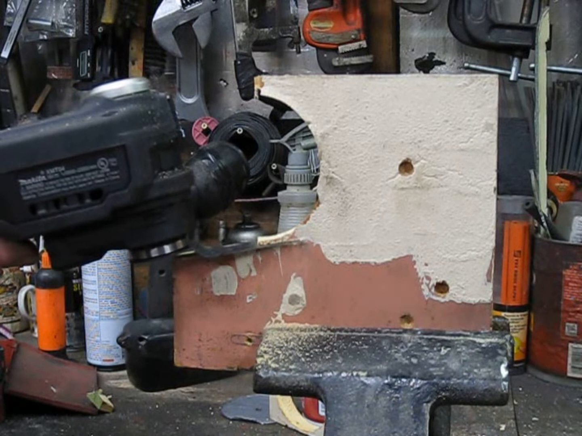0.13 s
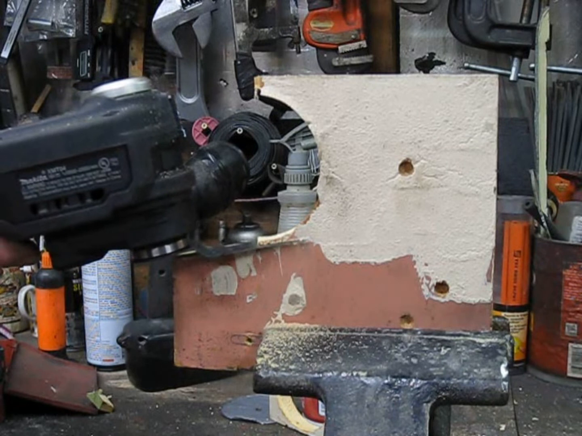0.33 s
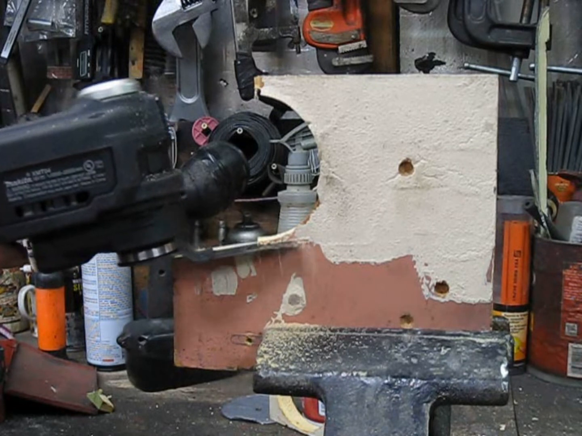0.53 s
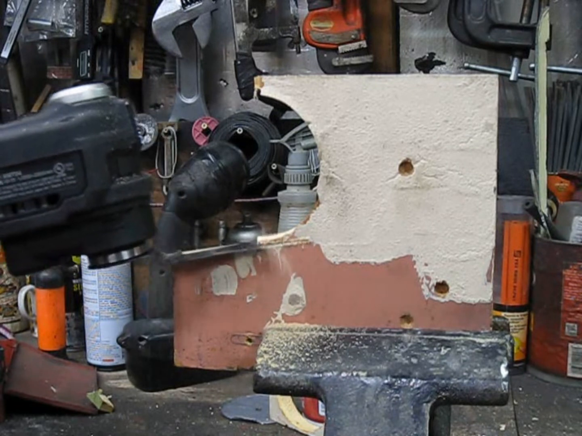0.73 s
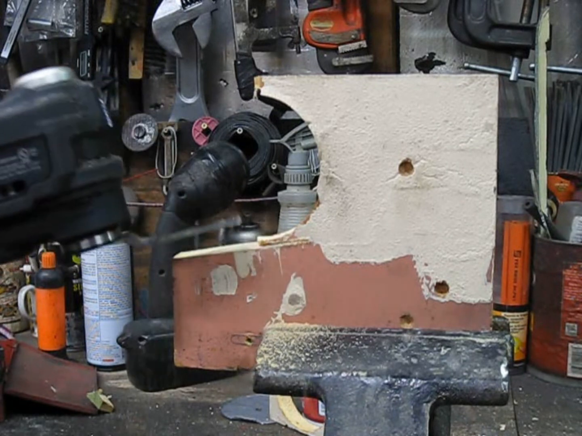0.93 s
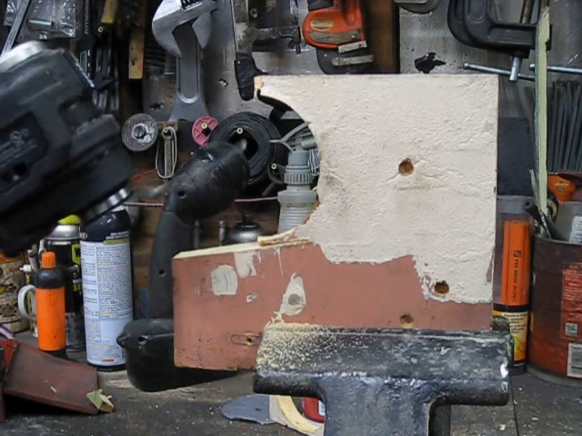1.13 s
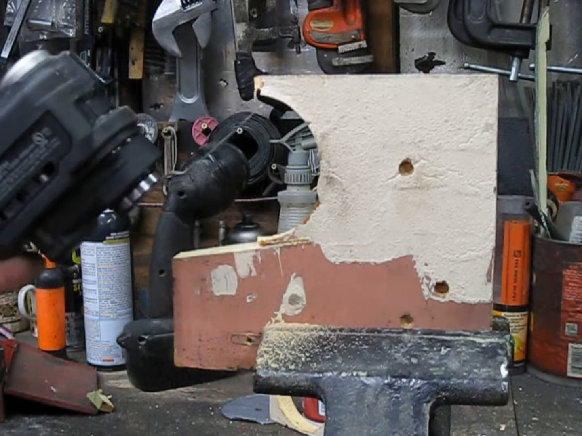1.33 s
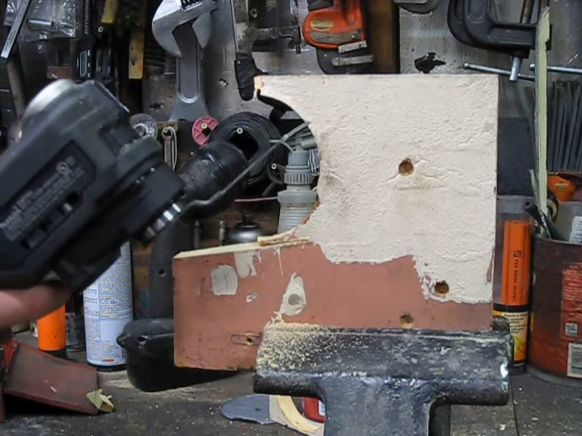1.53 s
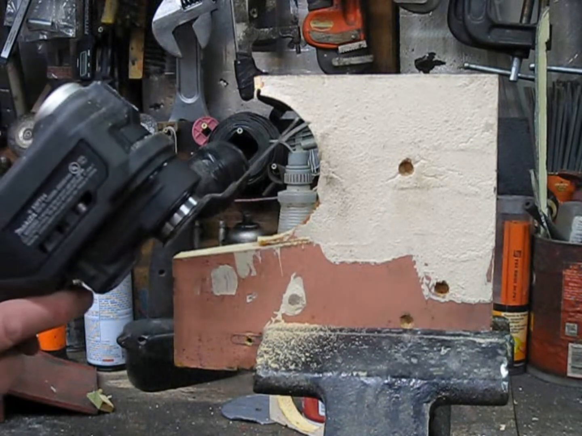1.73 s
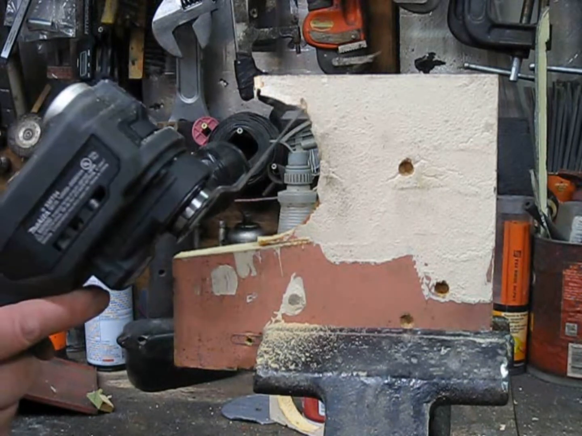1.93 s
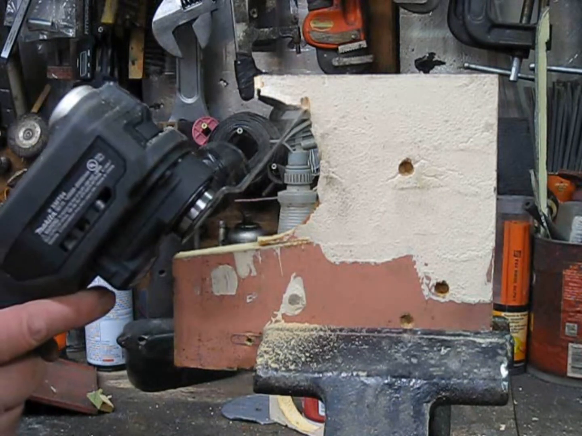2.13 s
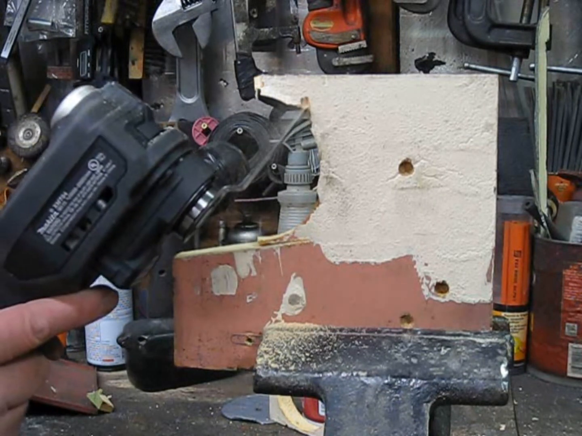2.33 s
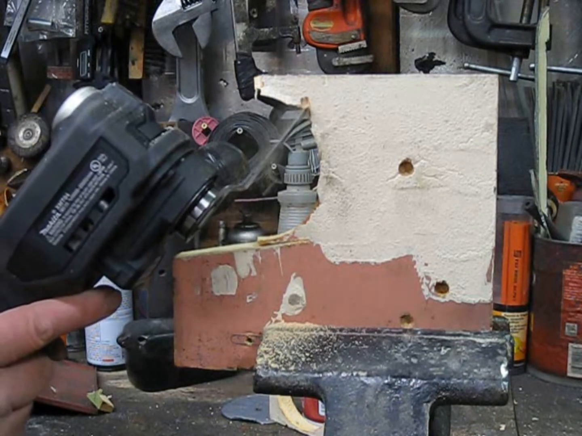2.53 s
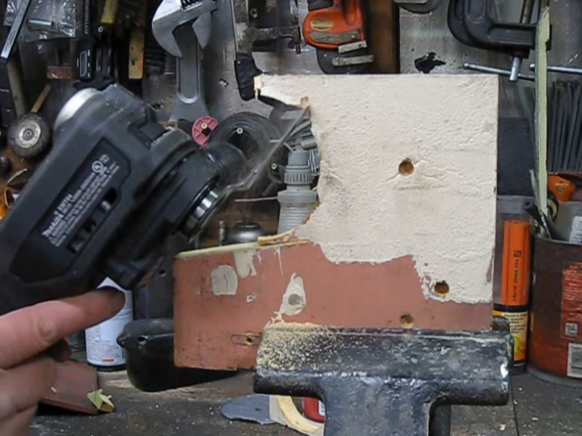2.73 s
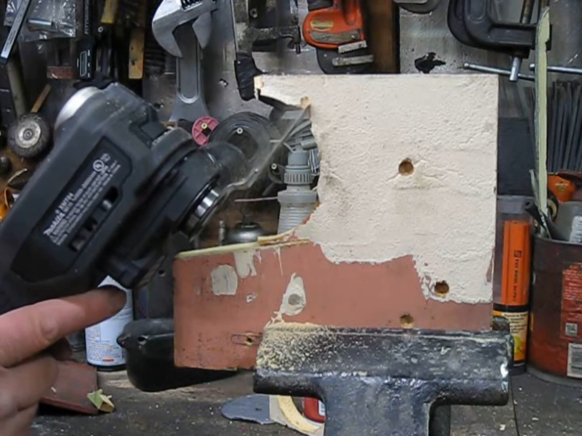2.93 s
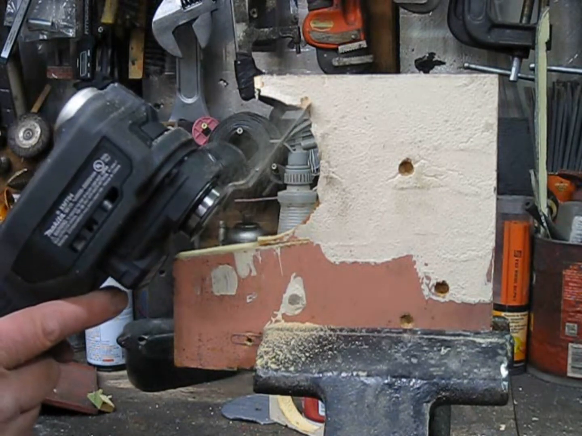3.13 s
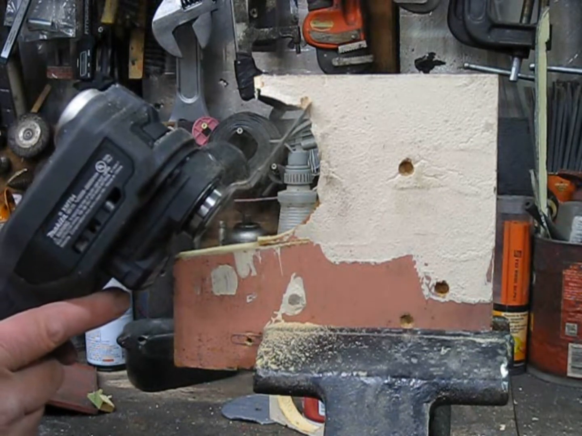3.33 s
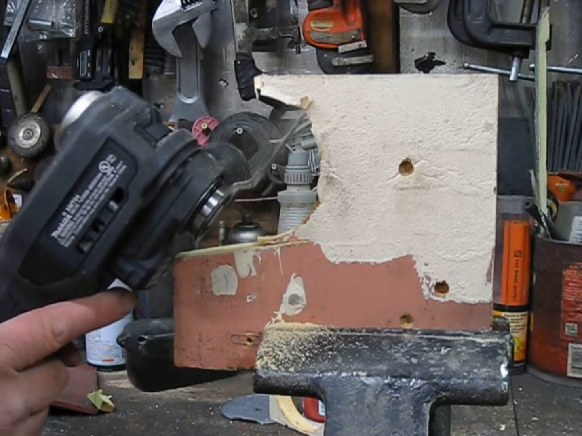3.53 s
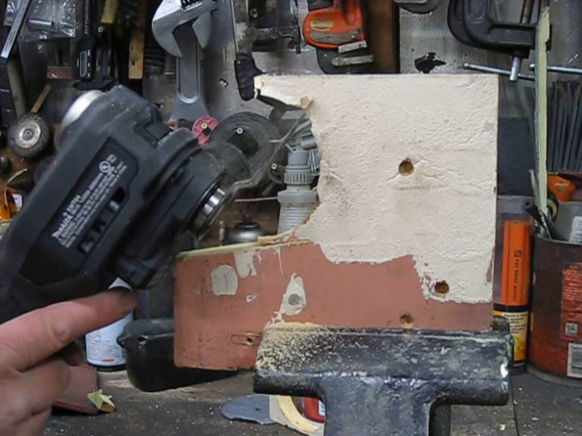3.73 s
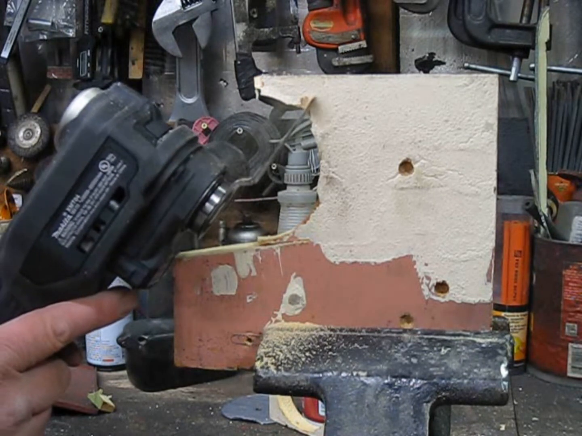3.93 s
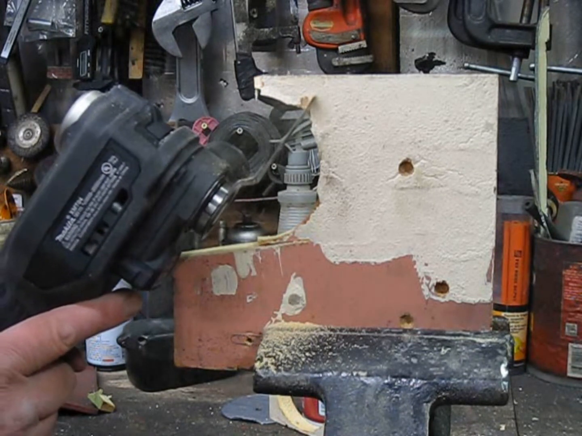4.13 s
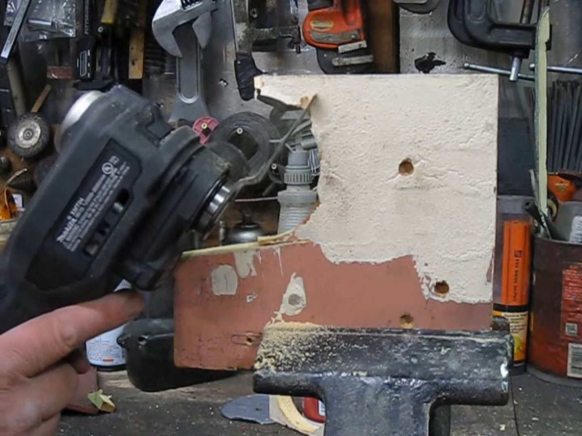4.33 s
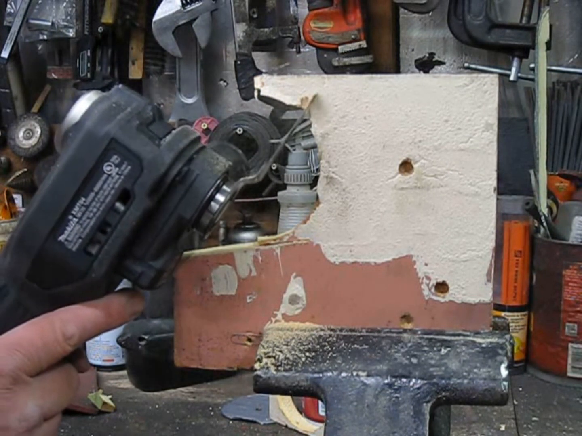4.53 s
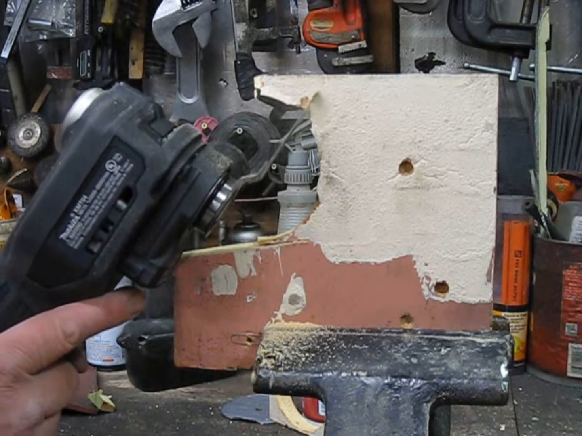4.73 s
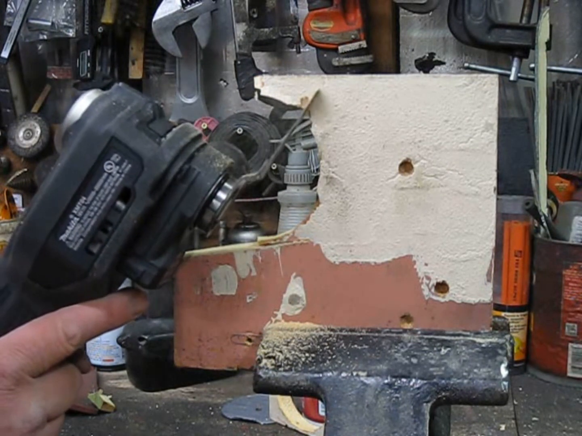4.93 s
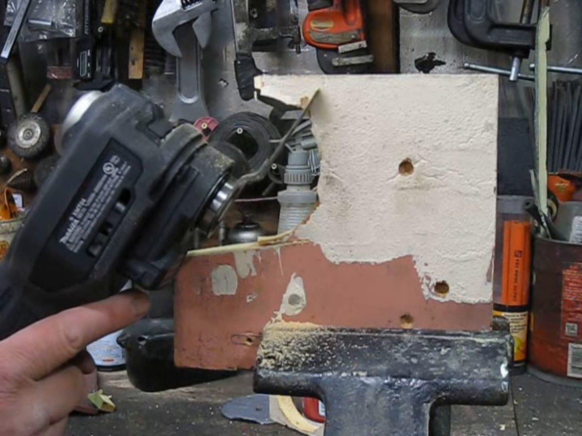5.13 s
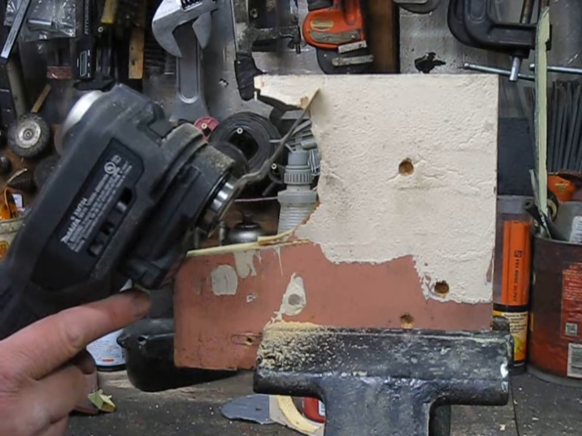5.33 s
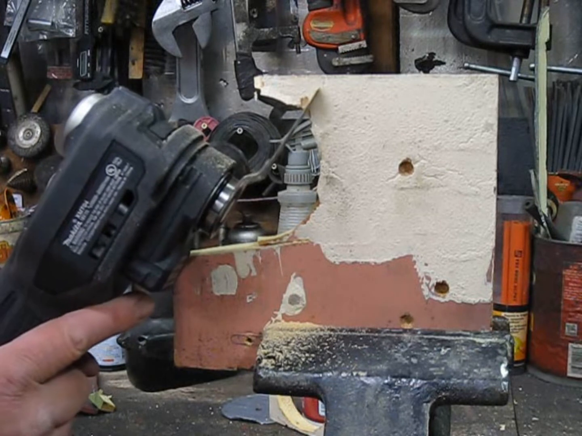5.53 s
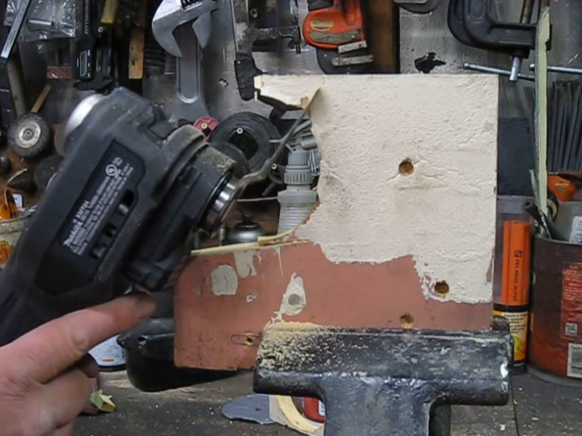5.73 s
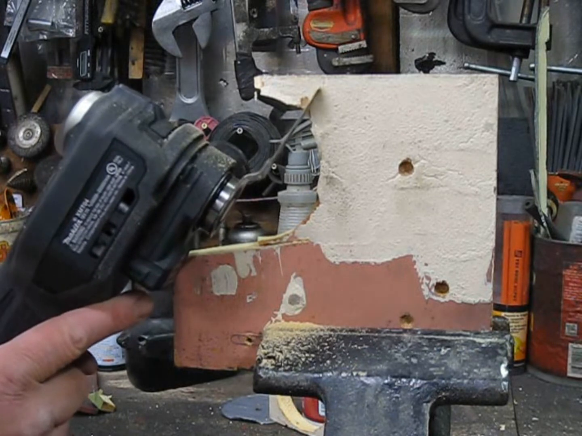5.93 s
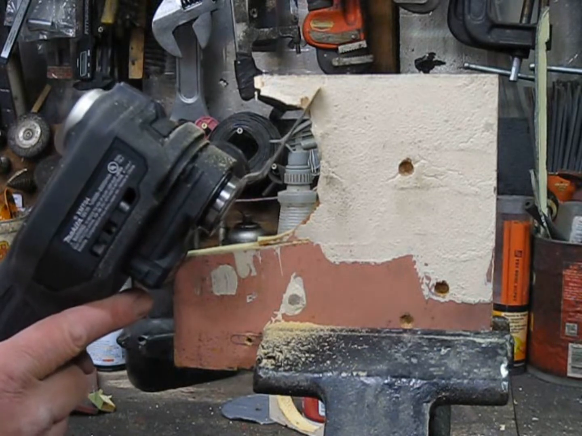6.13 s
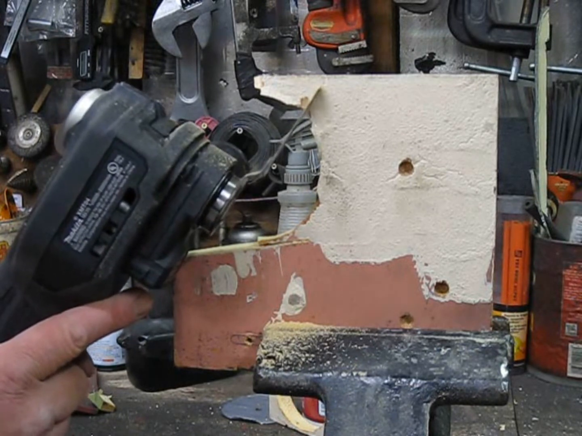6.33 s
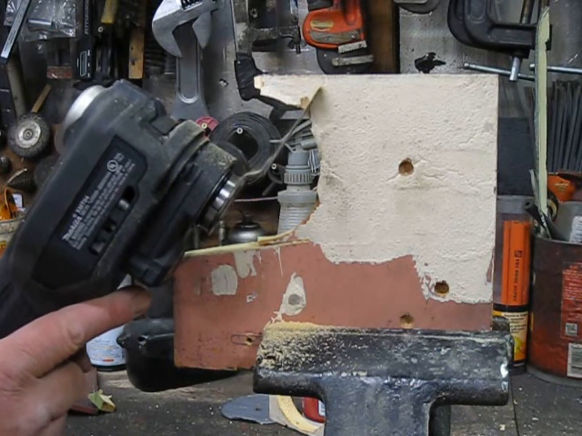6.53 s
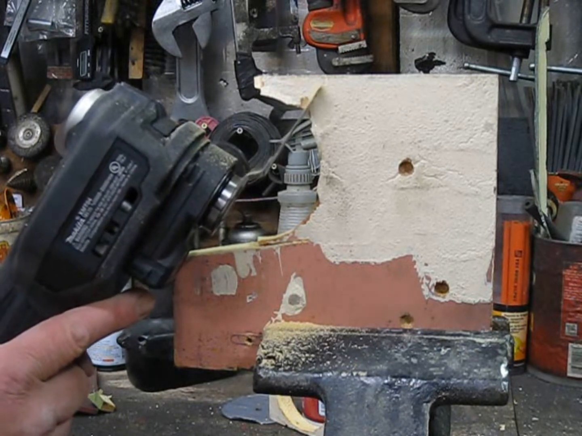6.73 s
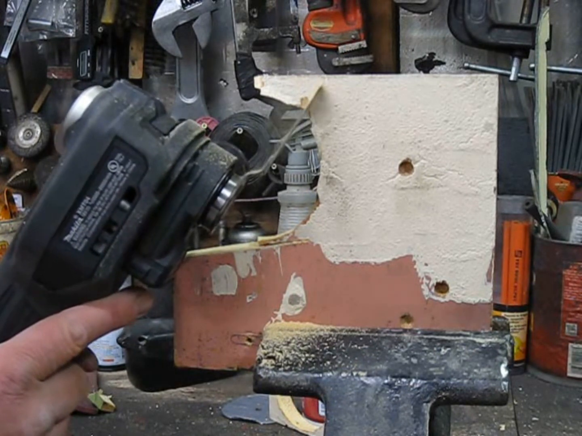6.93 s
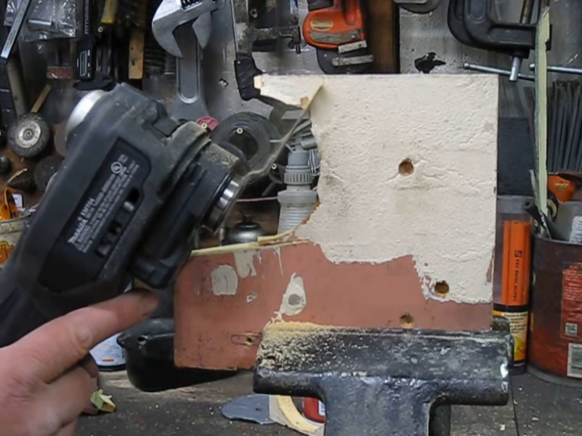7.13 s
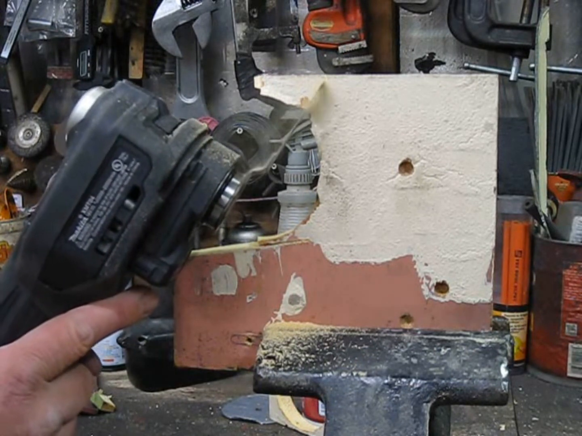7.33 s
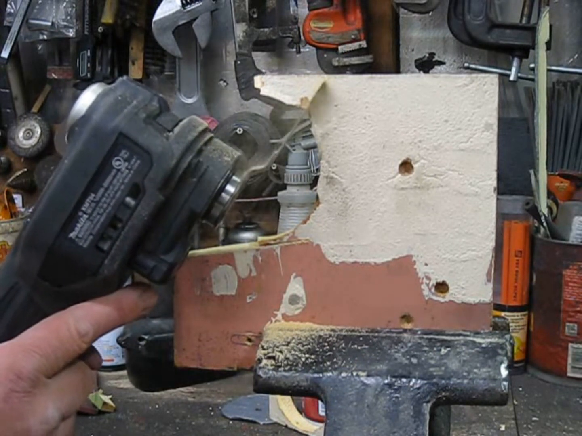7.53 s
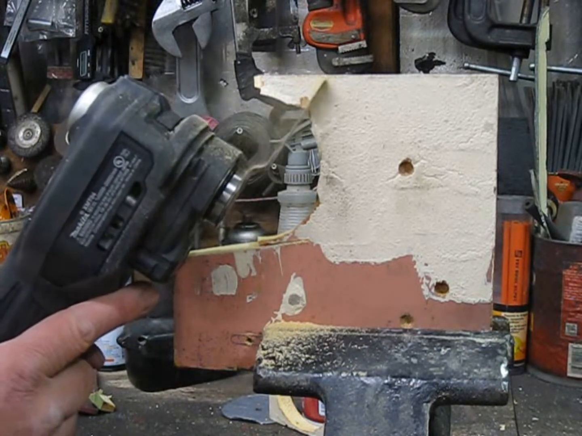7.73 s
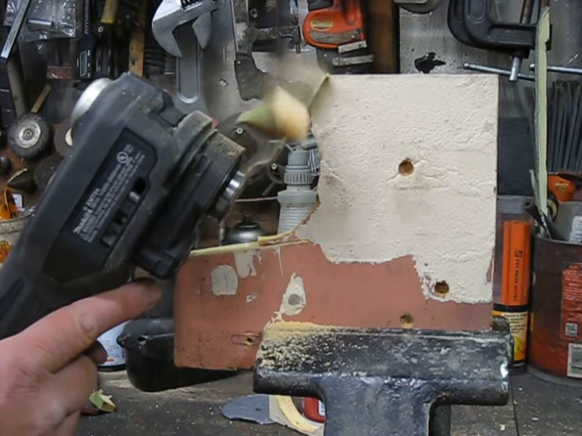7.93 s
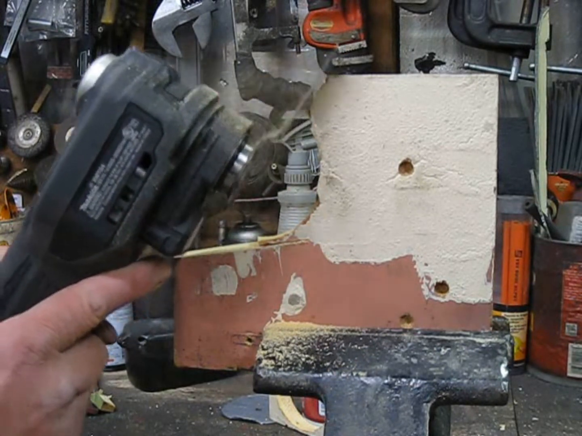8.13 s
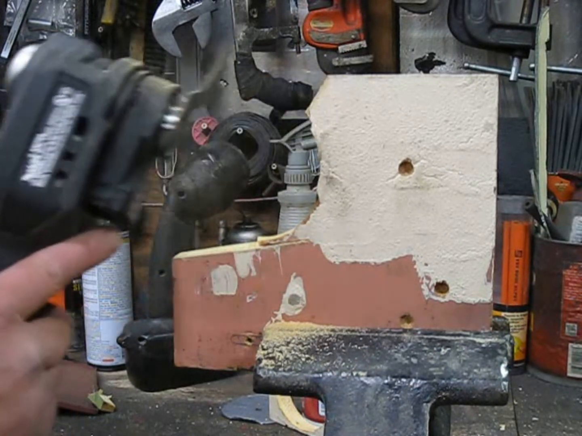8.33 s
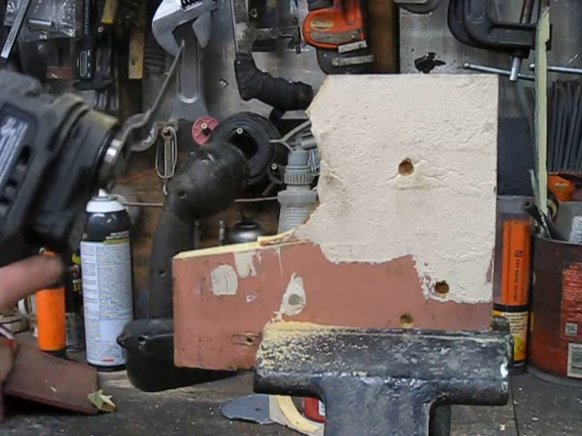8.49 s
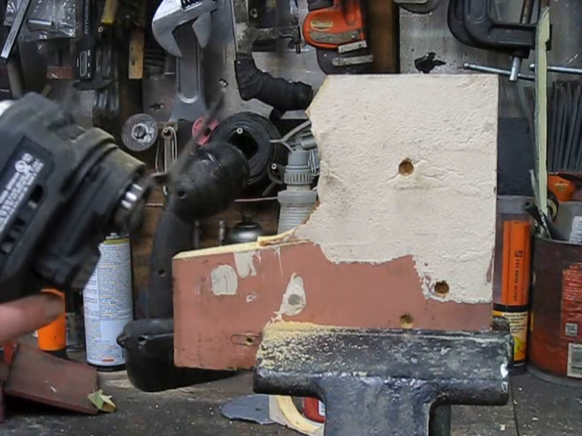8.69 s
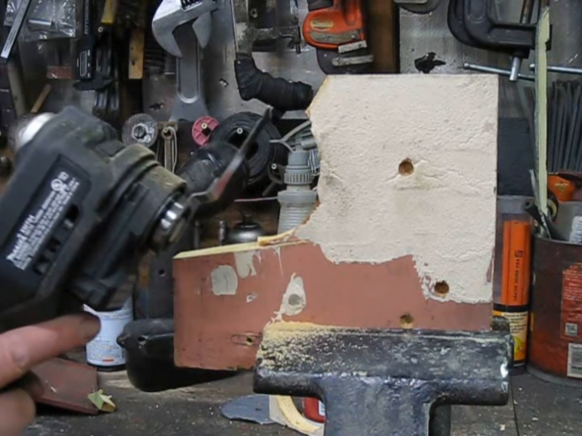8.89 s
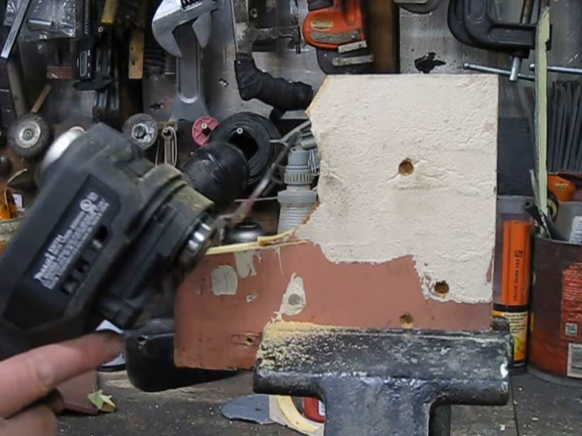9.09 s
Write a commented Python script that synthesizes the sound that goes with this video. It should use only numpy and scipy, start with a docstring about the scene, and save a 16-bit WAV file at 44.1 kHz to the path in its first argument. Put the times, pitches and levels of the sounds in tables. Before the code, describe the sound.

Loud rasping power-tool buzz in wood, a brief free-running whir, then a longer rattling cut rising in pitch until the offcut breaks away and the motor whines on.

```python
"""A small workshop, close by: a cordless oscillating multi-tool saws a corner off a board held in a vise.
The blade cuts, is lifted and runs free, bites in higher up and chatters; the speed dial is turned up
in three steps, the piece breaks off, and the freed blade rings while the motor whines on.
Timed strokes and scraping noise excite resonances of board and blade; the motor is wavering tones,
throbbing fan noise and clicks; snags are decaying noise, with high dying tones; shaped noise murmurs behind."""
import sys
import numpy as np
from scipy import signal
from scipy.io import wavfile
from scipy.ndimage import uniform_filter1d

SR = 44100
rng = np.random.default_rng(int(sys.argv[2]) if len(sys.argv) > 2 else 0)


def digitize_waveform(pressure):
    """Quantize a signal to 16-bit integers and store it at the path in sys.argv[1].

    Rows of a 2-D input are taken as channels; values are limited to [-1, 1].
    """
    field = np.atleast_2d(pressure).T
    bounded = np.clip(field, -1, 1)
    quanta = np.round(bounded * 32767).astype(np.int16)
    wavfile.write(sys.argv[1], SR, quanta)


N = 403956
TIME = np.arange(N) / SR
# nominal swings per second at the four dial settings
SLOW_HZ, LOW_HZ, HIGH_HZ, FAST_HZ = 163.5, 211.7, 269.2, 312.5


def cutting(turns, speed, contact, gains):
    """Strokes and scraping shake the board and the blade; the teeth tear out grit."""
    # modes of the board: main mode, then higher ones [f/Hz, width/Hz, level/dB]
    thump_modes = [(491, 76, 0)]
    knock_modes = [(665, 183, 7), (805, 83, 10), (1028, 68, 6), (1310, 310, -9.5)]
    # modes of the blade: bending, ringing, and its tip [f/Hz, width/Hz, level/dB]
    flex_modes = [(1454, 380, 3), (1509, 75, 12), (1544, 300, 3.5), (2600, 1600, -52)]
    ring_modes = [(2840, 490, 1), (3220, 170, 4), (3570, 160, 1), (3970, 140, -11)]
    tip_modes = [(5100, 200, -1), (8000, 270, 1), (10200, 210, 0.84)]
    # spectra of the bench under the vise and of the torn-out grit [f/Hz, level per Hz/dB]
    bench_spectrum = [(20, -3.5), (70, -1), (160, -3), (300, -7), (600, -25)]
    grit_spectrum = [(3000, -27.5), (3900, 2.5), (4900, 6), (5700, 4), (7800, 3), (10000, -4.5),
                     (12000, -11.5), (15500, -23.5)]
    # the blade's modes move with its seat in the kerf
    # [t/s, bending f/Hz, its prominence/dB, lower ring f/Hz, upper ring f/Hz, singing teeth f/Hz, level/dB]
    seat = [(0, 1830, 5, 2900, 3120, 4540, -8), (.2, 1890, 12, 2840, 3200, 4530, -5),
            (.28, 1770, 17, 3080, 3200, 4520, 5), (.47, 1860, 2, 2930, 3230, 4520, -16),
            (.68, 1750, 11, 3120, 3500, 4520, -2), (.8, 1782, 6, 3120, 3430, 4520, 3),
            (1.85, 1590, -1, 3170, 3340, 5210, -17), (2.6, 1570, 0, 3049, 3380, 5210, -2.5),
            (3.6, 1540, 1, 3130, 3380, 5210, -4.5), (4.8, 1603, -5, 3054, 3300, 5280, -8.5),
            (5.4, 1528, 2, 3060, 3343, 5100, -10), (5.95, 1570, 4, 3104, 3210, 5100, -17),
            (6.45, 1450, -20, 3090, 3320, 5100, -18), (6.85, 1374, 5, 2920, 3200, 4860, -11),
            (7.22, 1479, -3, 2960, 3160, 4860, -4), (7.4, 1360, 3, 2910, 3100, 4970, -16),
            (7.8, 1400, 2, 2850, 3190, 5000, -4)]
    # the blade whistles while still shallow in the kerf [t/s, f/Hz, level against its flexing/dB]
    whistle_track = [(0, 2010, -15), (.8, 1965, -10), (1.8, 2050, 3), (2.2, 2020, 2), (2.7, 1990, 4.5),
                     (3.6, 1964, 5), (4.1, 1965, -2), (5.6, 1980, -5), (6.3, 1958, -19.5)]
    # how far each part swells and sinks [thump/dB, knock/dB, flex/dB, ring/dB, grit/dB, tip/dB]
    swell_db = (1.05, 1.26, 2.25, 1.48, 0.72, 2.8)
    seat_play_hz = 180  # how far a fully rough cut throws the ringing modes about
    rattle_db_per_rough = 3.5  # in a rough cut the blade's ring comes in quick bursts
    chatter_hz = 22.68  # hops of the tool per second, before its drift

    hits, scrape = strokes(turns, contact)
    *_, rough, chatter = contact
    rasp = rough ** 1.5 * scrape
    flex_hz, flex_db, lower_hz, upper_hz, singing_hz, singing_db = curves(seat)
    whistle_hz, whistle_db = curves(whistle_track)
    on_board = shifting(hits + 0.7 * rasp, wet_db=-8, decay_s=0.004, hz=7)
    on_blade = shifting(hits + 1.7 * rasp, wet_db=-7, decay_s=0.005, hz=9)
    on_teeth = shifting(hits + 0.12 * scrape + 2.8 * rasp, wet_db=2, decay_s=0.0088, hz=8)

    # board and bench
    rumble = unit(colour(scrape, bench_spectrum))
    shake = levelled(ring(hits + 2.27 * rasp, thump_modes, 247, 840))
    hum = board_hum(turns, speed, contact)
    thump = hum + 0.49 * rough * shake + amp(-33.5) * rough * rumble
    knock = levelled(ring(on_board, knock_modes, 630, 1590))

    # blade, bending and whistling
    bending = amp(flex_db) * sing(on_blade, flex_hz, 346)
    whistle = amp(whistle_db) * sing(hits + rasp, whistle_hz, 70)
    flex = levelled(levelled(ring(on_blade, flex_modes, 1247, 2780)) + bending + whistle)

    # blade, ringing
    plate = ring(on_blade, ring_modes, 2100, 4450)
    play = seat_play_hz * rough * drift(30)
    steel = levelled(resonate(plate, lower_hz + play, 150) + resonate(plate, upper_hz + play, 150))
    steel = steel * amp(rattle_db_per_rough * rough * drift(90))

    # teeth and tip
    singing = amp(singing_db) * sing(on_teeth, singing_hz, 170)
    grit = levelled(levelled(colour(on_teeth, grit_spectrum)) + singing) * amp(0.6 * drift(70))
    tip = levelled(ring(on_teeth, tip_modes, 4100, 11200))

    layers = (thump, knock, flex, steel, grit, tip)
    parts = [part * amp(db * drift(17)) for part, db in zip(layers, swell_db)]
    # the whole tool hops in the hand
    hop = 1 + chatter * np.cos(2 * np.pi * chatter_hz * (TIME - 4.742) + 2.6 * drift(9.6))
    # under load the housing shudders at the swing rate, far more at speed
    shudder_depth = (speed / FAST_HZ) ** 2 * np.clip(speed / SLOW_HZ - 1, 0, 1)
    shudder = shudder_depth * np.sqrt(2) * np.sin(2 * np.pi * turns)
    return (gains * [*parts, shudder]).sum(0) * hop


def strokes(turns, contact, jitter_s=0.00011, scatter=0.3, scrape_s=0.0022,
            skip_lag_s=0.00025, creep_s=0.00016):
    """The blade pushes the wood at one end of each swing, pulls at the other; teeth scrape in between."""
    count = np.arange(int(2 * turns[-1]))
    swing = count // 2
    at = np.interp(count / 2, turns, np.arange(N))
    tracks = (*contact, drift(9), drift(22))
    back, second, third, rough, _, slip, creep = (track[at.astype(int)] for track in tracks)
    late, strong = rng.standard_normal((len(count), 2)).T
    # the blade bounces: only every second or third swing lands fully and on time;
    # a rough cut loses the pattern
    triple = 2 * np.pi * swing / 3 + 3 * rough * slip
    bounce = (1 + second * np.cos(np.pi * swing)) * (1 + third * np.cos(triple))
    sizes = np.where(count % 2, -back, 1) * bounce * np.exp(scatter * rough * strong)
    delay_s = rough * (jitter_s * late + creep_s * creep) + skip_lag_s * third * np.sin(triple)
    hits = clicks(at + SR * delay_s, sizes)
    # each stroke presses the teeth on for a moment
    r = np.exp(-1 / (SR * scrape_s))
    presses = signal.lfilter([1], [1, -2 * r, r * r], clicks(at, abs(sizes)))
    pressure = levelled(presses) + 0.4
    return levelled(hits), levelled(pressure * rng.standard_normal(N))


def board_hum(turns, speed, contact, mode_hz=486, width_hz=27, half_push=1.08, even_push=1.04,
              skip_depth=0.33, off_mode=0.012, lag_s=0.00066):
    """The board sings louder as a multiple of the swing rate nears its main mode; skips make it throb."""
    back, second, third, rough, _ = contact
    hum = 0
    for k, push in [(3 / 2, half_push * second), (2, even_push * (1 - back)), (3, 1)]:
        detune = (k * speed - mode_hz) / width_hz
        response = 1 / (1 + detune ** 2) + off_mode * (k == 2)
        tone = np.sqrt(2) * np.sin(2 * np.pi * k * (turns - lag_s * speed))
        hum = hum + push * response * tone
    skips = np.cos(2 * np.pi * turns / 3 + 2.4 * rough * drift(18))
    return hum * (1 + skip_depth * third * skips)


def shifting(x, wet_db, decay_s, hz, count=3):
    """Quick echoes inside a solid body, whose pattern keeps changing; in the blade, as the cut moves on."""
    t = TIME[:1024]
    tails = rng.standard_normal((count, len(t))) * np.exp(-t / decay_s)
    echoes = sum(drift(hz) * signal.oaconvolve(x, tail / np.linalg.norm(tail))[:N] for tail in tails)
    return x + amp(wet_db) * echoes / np.sqrt(count)


def handling():
    """What dial, cuts, easing and chatter do: the speed, how the blade lands, how loud each part is."""
    # cuts, with base levels [bites t/s, loses grip t/s, comes clear t/s, board thump/dB, board knock/dB,
    # blade flex/dB, blade ring/dB, tooth grit/dB, running noise/dB]
    cuts = [(-.07, 0.59, 0.803, -21, -31.5, -22.5, -24.5, -36.5, -37),
            (1.778, 7.82, 8.06, -17.5, -24, -26, -39.5, -37, -39.5)]
    # the hand shifts its pressure; easing off, the motor gains speed and the blade rattles in the kerf
    # [t/s, length/s, speed gained/Hz, board level/dB (half of it for the thump), flex/dB, ring/dB]
    eases = [(.23, 0.16, 1.59, -13, 0, -1), (.66, 0.042, 0.24, 1, 2.5, 5), (.735, 0.037, 0.4, -4, 2, 5),
             (2.05, 0.41, 0.22, 1, -1.5, -1), (3, 0.19, 1, 0.5, -1, 1), (4.2, 0.26, 1.28, 0, 0.5, 2),
             (4.83, 0.24, 1.63, -4, 0.5, 7.5), (5.17, 0.13, 0.57, -0.5, 0, 3),
             (5.82, 0.11, 2.5, -2.5, 1.5, 4.5), (5.93, 0.086, 0.48, -1.5, 1, 2),
             (6.4, 0.13, 0, -7.5, -3, -0.5), (6.8, 0.18, 0.14, -1, 3, 1.5),
             (7.02, 0.214, -0.08, -1.5, 3.5, 2.5), (7.38, 0.11, -0.15, -3, 1, 1.5),
             (7.6, 0.066, 1.24, -5, -1, 2), (7.84, 0.44, 1, -4, 2.5, -1.5), (7.873, 0.056, 1.6, 0, 0, 6),
             (7.976, 0.021, -0.5, 5, 6.5, 1), (8, 0.022, 0, 0, 2, -7)]
    # bouts of chatter [t/s, length/s, added roughness/0-1, added hop depth/1, extra return stroke/1,
    # extra skip of every 2nd swing/1, of every 3rd/1, grit level/dB]
    chatters = [(-.05, 0.22, 0.27, 0.0034, 0, 0.11, 0, 0), (.23, 0.18, 0.01, 0, 0.1, -0.084, 0.036, 2),
                (.39, 0.21, 0.17, 0, 0.38, -0.033, 0, 5), (.58, 0.21, 0.28, 0.013, 0.44, 0, 0, 5),
                (1.78, 0.23, 0.36, 0.028, 0.32, 0.16, 0, 3), (2.01, 0.49, 0.04, 0, 0, 0.081, 0.13, -1.5),
                (2.5, 2.04, 0.46, 0, 0.048, -0.14, 0.19, -0.5),
                (4.58, 0.27, 0.55, 0.27, 0.082, 0.13, 0.069, -0.5),
                (4.82, 1, 0.29, 0.033, 0.23, 0.09, 0.00096, -1),
                (6.04, 0.31, 0.41, 0.0082, 0.26, 0.15, 0, -0.5),
                (6.55, 0.24, 0.29, 0.068, 0.19, -0.081, 0, 1),
                (6.93, 0.1, 0.15, 0.087, 0.27, -0.092, 0, -2),
                (7.03, 0.13, 0.29, 0.0065, 0.41, 0.14, 0.019, -2),
                (7.19, 0.21, 0.1, 0.013, 0.13, 0.022, 0, 0), (7.84, 0.36, 0.16, 0.1, 0, -0.34, 0, -1)]
    bite_s, clear_s, recover_s = 0.11, 0.015, 0.094  # cut sets in, cut stops, running noise comes back
    # over the first seconds of a cut the blade flexes less and rings more,
    # and the running noise is heard less
    early_s, early_flex_db, early_ring_db, early_running_db = 2.76, -4.5, 13, -8.5
    # how fast each dies once the teeth lose their grip; the board hums on for a while first
    thump_db_per_s, knock_db_per_s, flex_db_per_s, thump_hold_s = 173, 139, 74, 0.062
    tip_db, tip_rise_s = -33.5, 0.24  # the tip rings up as the teeth lose their grip
    shudder_db = -41.5  # the housing under load
    grit_speed_db = 2.5  # more grit at top speed
    ease_edge_s, ease_grit_share = 0.064, 0.65  # time to ease off; share of the ring's gain in the grit
    chatter_edge_s = 0.056  # longest time a bout takes to set in
    smooth_hop, wander_hz = 0.11, 0.197  # base hop depth; wander of the speed in the wood at SLOW_HZ
    second_per_rough, third_per_rough = 0.038, 0.43  # a rough cut skips every 2nd and 3rd swing more

    speed, back, second, base_rough, knock_dial, ring_dial, running_dial = dial()
    gained, board_ease, flex_ease, ring_ease = spells(eases, ease_edge_s)
    bouts = spells(chatters, chatter_edge_s)
    rough, hop, extra_back, extra_second, extra_third, grit_chatter = bouts
    current = sum(TIME >= cut[0] for cut in cuts[1:])
    bite, loose, clear, thump, knock, flex, steel, grit, loaded = np.transpose(cuts)[:, current]
    under_way = ramp(bite, early_s)
    slack = np.clip(TIME - loose, 0, 1)  # seconds since the grip was lost
    fast = (speed - SLOW_HZ) / (FAST_HZ - SLOW_HZ)
    engaged = ramp(bite, bite_s) - ramp(clear, clear_s)
    gains = engaged * amp([
        thump + board_ease / 2 - thump_db_per_s * np.maximum(slack - thump_hold_s, 0),
        knock + knock_dial + board_ease - knock_db_per_s * slack,
        flex + flex_ease + early_flex_db * under_way - flex_db_per_s * slack,
        steel + ring_dial + ring_ease + early_ring_db * under_way,
        grit + grit_chatter + ease_grit_share * ring_ease + grit_speed_db * fast,
        tip_db + 20 * np.log10(np.clip(slack / tip_rise_s, 1e-3, 1)),
        np.full(N, shudder_db)])
    load = ramp(bite, bite_s) ** 3 - ramp(clear, recover_s) ** 0.5
    running_gain = amp((loaded + running_dial + early_running_db * under_way) * load)
    rough = np.clip(base_rough + rough, 0, 1)
    gained = gained + wander_hz * (speed / SLOW_HZ) ** 2 * drift(14) * engaged
    second = second + extra_second + second_per_rough * rough
    third = extra_third + third_per_rough * rough
    contact = back + extra_back, second, third, rough, smooth_hop + hop
    return speed + gained, contact, gains, running_gain


def dial():
    """The tool glides from each setting to the next like a damped spring."""
    # dial settings; the levels are offsets to those of the cut [t/s, swing rate f/Hz, return stroke share/1,
    # skip of every 2nd swing/1, roughness/0-1, knock level/dB, ring level/dB, running noise level/dB]
    steps = [(0, SLOW_HZ, 0.12, 0.04, 0.16, -2, -3, 26), (6.225, LOW_HZ, 0.16, 0.02, 0.1, -0.5, 6, 6),
             (6.637, HIGH_HZ, 0.3, 0.014, 0.05, 0.5, 3.5, 8), (7.077, FAST_HZ, 0.37, 0.5, 0.12, -1.5, 4, 2)]
    settle_s = 0.052  # time constant at the top setting; lower settings are reached sooner
    settings = np.array(steps)[:, 1:]
    elapsed = np.array([np.maximum(TIME - s, 0) / (settle_s * hz / FAST_HZ) for s, hz, *_ in steps[1:]])
    glide = 1 - (1 + elapsed) * np.exp(-elapsed)
    return settings[0][:, None] + np.diff(settings, axis=0).T @ glide


def catches():
    """Short noise cracks as the blade snags or breaks through; high dying tones as it comes free."""
    # the blade catches an edge [t/s, level/dB, decay/s, brightness per octave/dB]
    snags = [(1.7712, -9, 0.0045, 2.5), (1.8375, -11.5, 0.0074, -6), (1.845, -19, 0.022, 15),
             (7.83, -19, 0.0026, -2), (7.978, -25, 0.0038, 4), (8.036, -30, 0.034, 4),
             (8.053, -19.5, 0.019, 0), (8.059, -12, 0.002, 13), (8.065, -15.5, 0.0069, 5),
             (8.072, -17, 0.011, 0.5)]
    # spectrum of a crack before its brightness [f/Hz, level per Hz/dB]
    crack_spectrum = [(150, -34), (500, 3), (1200, 2.5), (2000, 8), (3500, 3.5), (5500, -1), (8000, -3),
                      (11000, -17.5), (16000, -27)]
    # high tones as the blade comes free, of steel and of the slowing motor [t/s, f/Hz, level/dB, decay/s]
    high_tones = [(1.773, 7510, -33, 0.044), (8.055, 7335, -25, 0.045), (8.078, 9870, -25.5, 0.11),
                  (8.085, 9110, -35, 0.22)]
    glide_share, glide_s = 0.0115, 0.087  # each glides down slightly as it dies
    out, t = np.zeros(N), TIME[:SR // 2]
    for s, db, decay, bright in snags:
        spectrum = [(hz, level + bright * np.log2(hz)) for hz, level in crack_spectrum]
        crack = unit(colour(rng.standard_normal(len(t)), spectrum))
        add(out, s, amp(db) * crack * np.exp(-t / decay))
    glide = np.cumsum(1 + glide_share * np.exp(-t / glide_s)) / SR
    for s, hz, db, decay in high_tones:
        add(out, s, amp(db) * np.sin(2 * np.pi * hz * glide) * np.exp(-t / decay))
    return out


def motor(turns, speed):
    """The tool's own noise crossfades from a slow to a fast character as its speed rises."""
    # tones of crank, motor and bearings [multiple of the swing rate/1, level/dB, waver f/Hz]
    slow_tones = [(1, -39, .3), (4, -41, 3), (5, -42, 3), (6, -46, 3), (9, -37, 2), (13.05, -36, 6),
                  (19, -37, 4), (19.42, -28, 10), (20.9, -40, 12), (23, -43, 6), (25.5, -45, 4),
                  (29.1, -45, 12), (91.7, -66, 6)]
    fast_tones = [(1, -33, .3), (4.462, -31, 1.5), (5, -38, .5), (6, -39, .5), (7, -25.5, .4), (9, -35, .5),
                  (10, -30, .5), (11.06, -40, 2), (15, -46, 3), (16, -42, 3), (17, -39, 3), (23, -46, 2),
                  (29, -41, 4), (31, -44, 4), (46.5, -54, 20), (47.5, -54, 20), (48.5, -52, 20)]
    # spectra of fan air and mechanism rattle [f/Hz, level per Hz/dB]
    slow_air = [(40, -21), (80, -15), (200, -10.5), (450, -2.5), (900, -2.5), (1200, -16), (2100, -2.5),
                (2500, -7.5), (2750, 2.5), (3000, 1.5), (3400, -1), (3700, -6.5), (5500, -10), (5800, -17),
                (10000, -20.5), (15500, -38)]
    fast_air = [(50, -25), (200, -14), (550, -0.5), (900, 2.5), (1800, -7), (2150, 1), (2500, -9),
                (3300, -5.5), (4000, -15.5), (8800, -17.5), (9400, -12), (11000, -18.5), (13000, -28),
                (14800, -25)]
    slow_rattle = [(1000, -17), (3100, 15), (5400, -13), (6000, 4), (10000, -12), (15000, -30)]
    fast_rattle = [(1500, -6), (3300, 0), (5200, 0), (7500, -4), (9700, -1), (12800, -14), (14600, -8),
                   (15400, -12), (15800, -16)]
    turned = np.clip((speed - SLOW_HZ) / (FAST_HZ - SLOW_HZ), 0, 1)
    slow = running(turns, slow_tones, slow_air, air_db=-26.0,
                   rattle=slow_rattle, rattle_db=-37.5, throb=0.26)
    slow = slow + bearing(turns)
    fast = running(turns, fast_tones, fast_air, air_db=-25.5,
                   rattle=fast_rattle, rattle_db=-33.0, throb=0.94)
    return (1 - turned) * slow + turned * fast


def running(turns, tones, air, air_db, rattle, rattle_db, throb):
    """Wavering tones, fan air that throbs twice per swing with the crank, and play in the drive."""
    whine = 0
    for k, db, waver in tones:
        phase = k * turns + np.cumsum(waver * drift(60)) / SR
        # higher tones flutter more in level
        level_db = db + min(k / 8, 2) * drift(11) + min(k / 14, 1.6) * drift(2.5)
        whine = whine + amp(level_db) * np.sqrt(2) * np.sin(2 * np.pi * phase)
    throbbing = 1 + throb * np.cos(4 * np.pi * turns)
    fan = unit(colour(rng.standard_normal(N) * throbbing, air))
    at = np.interp(np.arange(int(turns[-1])), turns, np.arange(N))
    knocks = clicks(at, 1 + 0.1 * rng.standard_normal(len(at)))
    play = levelled(colour(shifting(knocks, wet_db=2, decay_s=0.004, hz=2), rattle))
    return whine + amp(air_db + 0.6 * drift(25)) * fan + amp(rattle_db + 0.9 * drift(9)) * play


def bearing(turns, db=-41, waver_hz=4.5, passes_per_swing=4.865):
    """Balls tick past a flaw at a slightly unsteady rate: a ladder of fuzzy high tones."""
    # spectrum of the ball bearing's whine [f/Hz, level/dB]
    whine_spectrum = [(3000, -41), (4800, -7), (5550, 8), (6400, 0), (9500, 1.5), (11100, -8), (12700, -19),
                      (15200, -18)]
    passes = passes_per_swing * turns + np.cumsum(waver_hz * drift(70)) / SR
    at = np.interp(np.arange(int(passes[-1])), passes, np.arange(N))
    return amp(db) * unit(colour(clicks(at, np.ones(len(at))), whine_spectrum))


def reflections(x, wet_db, decay_s, size=8192):
    """The small room close around: a dense, quickly dying cluster of echoes."""
    tail = rng.standard_normal(size) * np.exp(-np.arange(size) / SR / decay_s)
    return x + amp(wet_db) * signal.oaconvolve(x, tail / np.linalg.norm(tail))[:N]


def room_tone():
    """The low murmur of the workshop: steady shaped noise."""
    # spectrum of the murmur [f/Hz, level per Hz/dB]
    murmur_spectrum = [(20, -24), (60, -19), (120, -19), (300, -15), (1000, 1.5), (16000, -29)]
    return amp(-38.0) * unit(colour(rng.standard_normal(N), murmur_spectrum))


def amp(db):
    """Decibels to gain."""
    return np.exp(np.asarray(db) * (np.log(10) / 20))


def unit(x):
    """Scales to rms 1."""
    return x / np.sqrt(np.mean(x ** 2) + 1e-20)


def levelled(x, size=2200):
    """Holds the running rms near 1, leaving the fast flutter."""
    power = uniform_filter1d(uniform_filter1d(x ** 2, size), size)
    return x / np.sqrt(abs(power) + 1e-12)


def curves(rows):
    """The columns of a time table, interpolated sample by sample."""
    s, *columns = np.transpose(rows)
    return [np.interp(TIME, s, c) for c in columns]


def ramp(s, length_s):
    """Rises from 0 to 1, starting at s."""
    return np.clip((TIME - s) / length_s, 0, 1)


def spells(rows, edge_s):
    """Each row (s, length, values) holds its values a while, with sloping edges; short ones set in faster."""
    rows = np.array(rows)
    edges = np.minimum(edge_s, rows[:, 1] / 2)
    held = [ramp(s - edge / 2, edge) - ramp(s + length - edge / 2, edge)
            for (s, length), edge in zip(rows[:, :2], edges)]
    return rows[:, 2:].T @ np.array(held)


def drift(hz):
    """Slow chance of rms 1 that takes a new random value hz times a second, gliding in between."""
    knots = rng.standard_normal(4096)
    return unit(np.interp(TIME * hz, np.arange(len(knots)), knots))


def colour(x, points, size=2048):
    """Causal minimum-phase filter with the spectrum (Hz, dB)."""
    hz, db = np.transpose(points)
    bins = np.log(abs(np.fft.fftfreq(size, 1 / SR)) + 1)
    log_gain = np.log(amp(np.interp(bins, np.log(hz + 1), np.maximum(db, -100))))
    taps = np.fft.ifft(np.exp(np.conj(signal.hilbert(log_gain)))).real
    return signal.oaconvolve(x, taps)[:len(x)]


def ring(x, modes, low_hz, high_hz):
    """A body with a few modes, alternating in sign, that radiates between two frequencies."""
    y = 0
    for k, (hz, width, db) in enumerate(modes):
        y = y + (-1) ** k * amp(db) * signal.lfilter(*signal.iirpeak(hz, hz / width, SR), x)
    return signal.sosfilt(signal.butter(3, [low_hz, high_hz], "band", fs=SR, output="sos"), y)


def resonate(x, hz, width):
    """A resonance of gain 1 that follows the curve hz: shift down, smooth, shift back up."""
    turn = np.exp(2j * np.pi * np.cumsum(hz * np.ones(len(x))) / SR)
    r = np.exp(-np.pi * width / SR)
    return 2 * (turn * signal.lfilter([1 - r], [1, -r], x / turn + 1e-18)).real


def sing(x, hz, width):
    """A steep moving resonance, its running rms held near 1."""
    return levelled(resonate(resonate(x, hz, width), hz, width), size=800)


def clicks(at, sizes, order=8):
    """Sharp pulses at exact places between samples, as windowed sincs."""
    index = np.floor(at).astype(int)[:, None] + np.arange(-order, order + 1)
    offset = index - at[:, None]
    shape = np.sinc(offset) * np.cos(np.pi * offset / (2 * order + 2)) ** 2
    return np.bincount(np.clip(index, 0, N - 1).ravel(), (sizes[:, None] * shape).ravel(), N)


def add(mix, s, sound):
    """Mixes a sound in at a time."""
    part = mix[round(s * SR):][:len(sound)]
    part += sound[:len(part)]


def scene():
    """Tool and board with their echoes, and the low murmur of the workshop."""
    speed, contact, gains, running_gain = handling()
    turns = np.cumsum(speed + 0.1098 * drift(30)) / SR  # swings so far
    tool = cutting(turns, speed, contact, gains) + running_gain * motor(turns, speed) + catches()
    return (reflections(tool, wet_db=-17, decay_s=0.025) + room_tone())[None]


def record(dry):
    """The microphone chain's band limit: a steep linear-phase low-pass."""
    edge_hz = 15780
    taps = signal.firwin(511, edge_hz, window=("kaiser", 9), fs=SR)
    return signal.oaconvolve(dry, taps[None], "same")


dry = scene()
out = record(dry)
digitize_waveform(out)
```